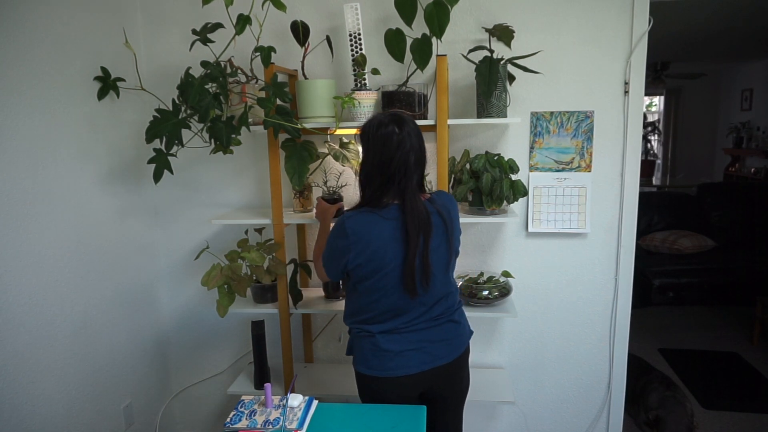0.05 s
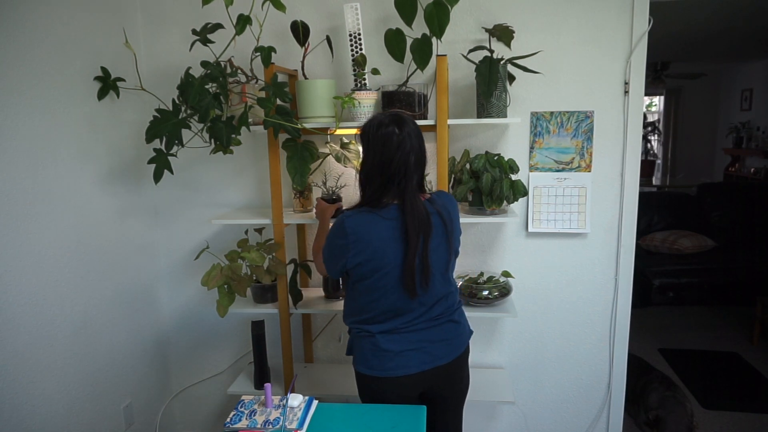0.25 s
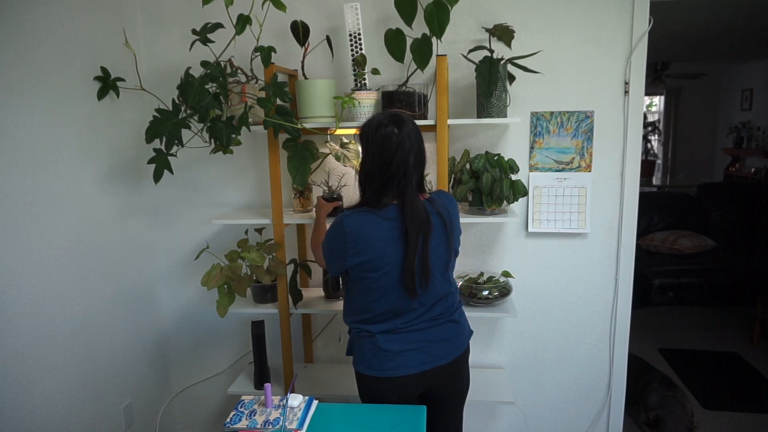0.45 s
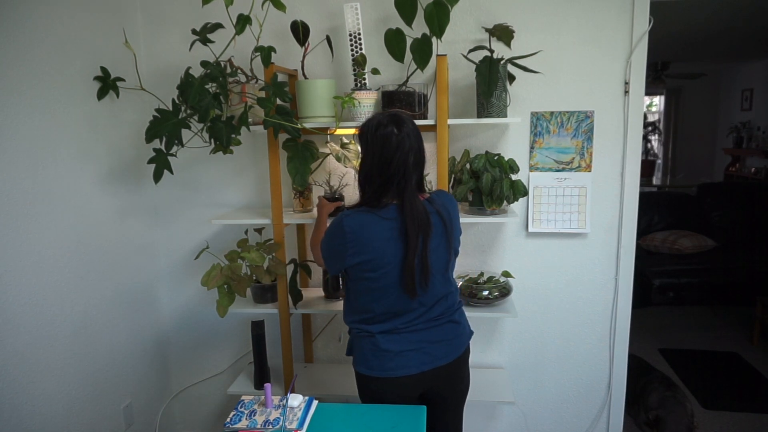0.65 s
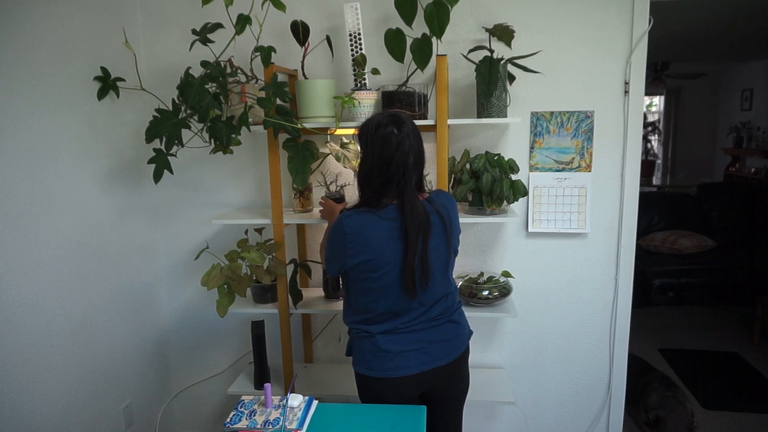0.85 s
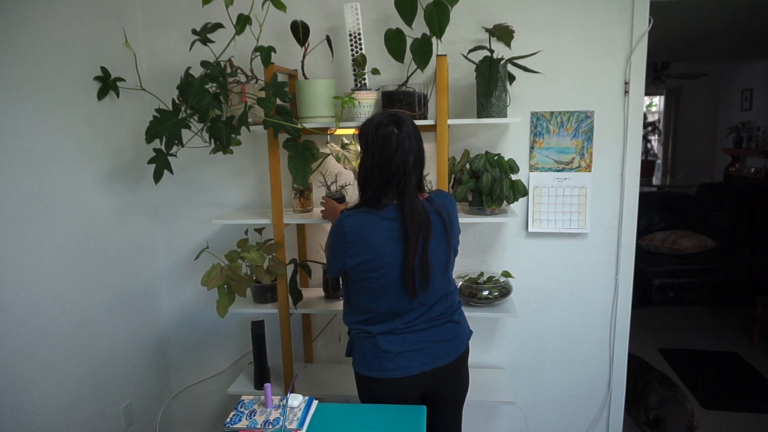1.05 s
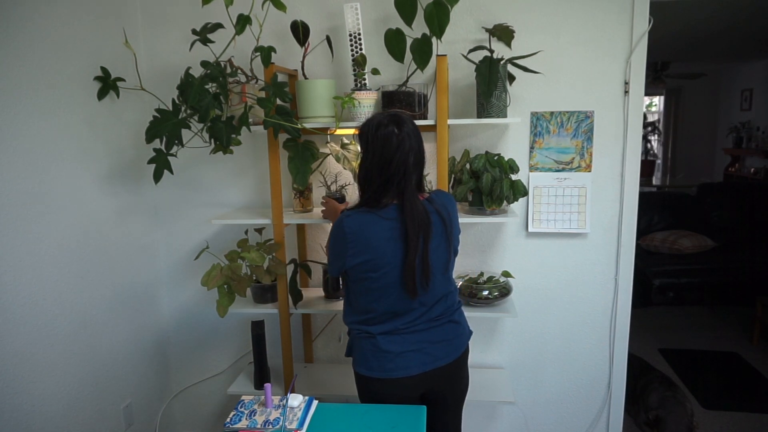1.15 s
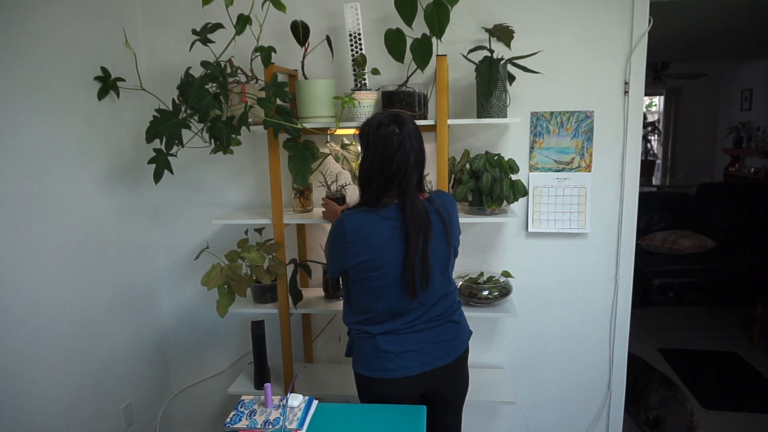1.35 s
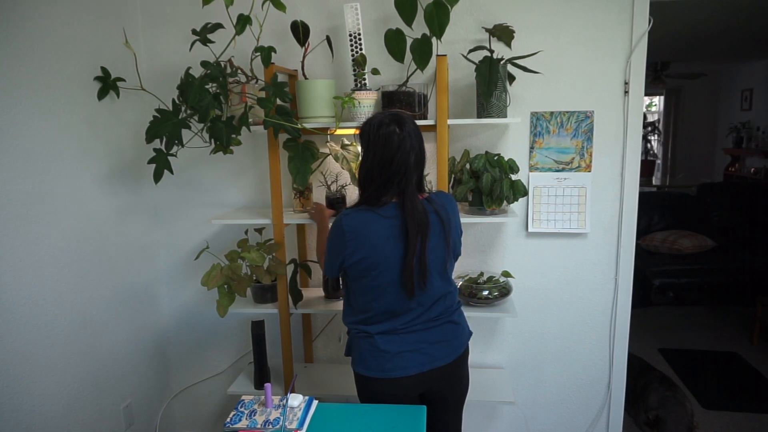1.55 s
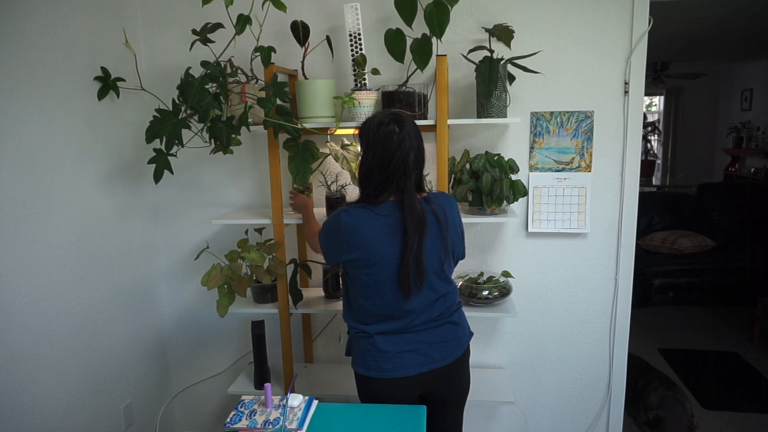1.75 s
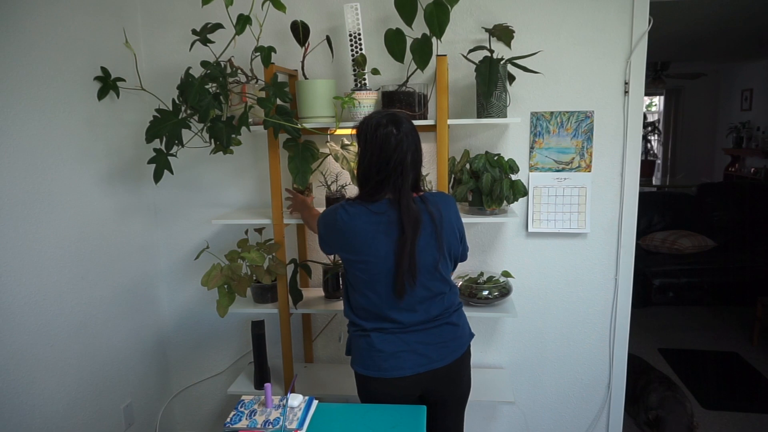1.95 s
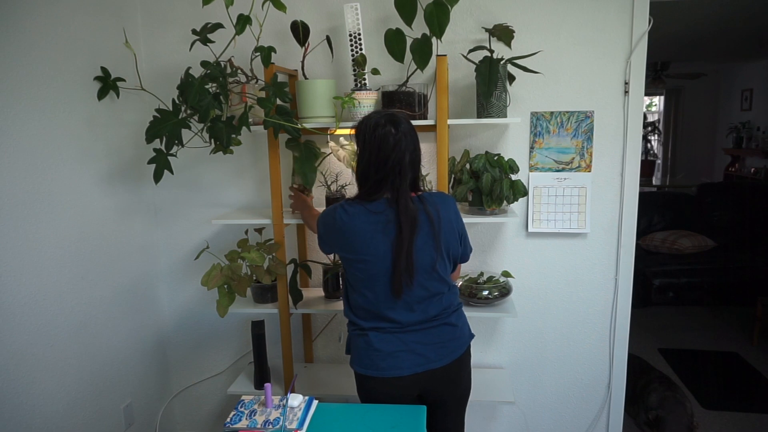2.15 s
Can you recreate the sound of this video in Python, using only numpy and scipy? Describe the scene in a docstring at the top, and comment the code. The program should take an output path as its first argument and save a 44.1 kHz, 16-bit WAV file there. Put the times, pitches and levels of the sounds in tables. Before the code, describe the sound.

A plant pot lands on a light shelf with a knock and rattle, then is pushed into place in three short, ringing scrapes. Leaves rustle faintly afterwards. The small room echoes a little, and a fan hums softly nearby.

```python
"""A plant pot is set down on a light shelf in a small room, then pushed into place in three short scrapes.
Its rim knocks and rattles as it lands, and its base sticks and slips as it slides.
Both make pot and shelf ring together, and the room echoes. Afterwards the leaves rustle faintly.
A small fan hums nearby, over a quiet hiss and a soft rush of air."""
import sys
import numpy as np
from scipy import signal
from scipy.fft import rfft, irfft
from scipy.io import wavfile

SR = 44100
rng = np.random.default_rng(int(sys.argv[2]) if len(sys.argv) > 2 else 0)


def materialize(psi):
    """Save the field psi as 16-bit PCM at rate SR to the path in sys.argv[1].

    A 1-D psi becomes a single channel; in a 2-D psi each row is a channel.
    """
    bounded = np.clip(np.atleast_2d(psi).T, -1, 1)
    quanta = np.round(bounded * 32767).astype(np.int16)
    wavfile.write(sys.argv[1], SR, quanta)


N = 97020   # 2.2 seconds
T = np.arange(N) / SR


def pot():
    """Knocking and sliding make pot and shelf ring and clatter, and the room answers."""
    struck, rubbed = knocks(POT_KNOCKS), slips()
    tones = ringing_tones(struck, rubbed)
    echo = from_db(-19) * heard(tones, room_response())
    return tones + echo + clatter(rubbed)


# The pot lands, rocks and bumps. Each row: start in seconds, level in dB, brightness in Hz.
POT_KNOCKS = [(0.2126, -8.5, 7240), (0.2170, -2, 4560), (0.2206, 1.5, 1700), (0.2256, 0, 443),
              (0.2288, 0, 455), (0.2368, -17, 490), (0.2488, -7, 1000), (0.2630, 0, 1005),
              (0.2799, -4, 400), (0.2987, -5, 613), (0.3280, -21, 800), (0.3680, -13.5, 2500),
              (0.411, -18, 3500), (0.627, -26.5, 1200), (1.222, -22, 450), (1.247, -27, 600)]

def knocks(rows):
    """Each knock is a short pulse of force; a softer contact lasts longer and sounds duller."""
    force = np.zeros(N)
    for start, db, brightness_hz in rows:
        click = np.arange(N) == int(start * SR)
        decay = np.exp(-2 * np.pi * brightness_hz / SR)
        force += from_db(db) * signal.lfilter([1 - decay], [1, -decay], click + 1e-18)
    return force


# One list for each push. Each row: time in seconds, friction level in dB, extra bass in dB.
POT_PUSHES = [
    [(0.235, -6, 3.5), (0.29, -1.5, 4), (0.34, -3.5, 4.5), (0.39, -0.5, -0.5), (0.412, 1, -19),
     (0.44, -4, -6), (0.464, 0, -4), (0.50, -8, -6), (0.555, -10.5, -1), (0.58, -41, -6)],
    [(0.612, -12.5, -4), (0.630, -6, -7), (0.655, -6.5, -14), (0.674, 1, -16), (0.71, -3.5, -2),
     (0.745, -0.5, 1), (0.78, -4.5, 3), (0.818, -13, -1), (0.832, -14, 2)],
    [(1.122, -23.5, 7), (1.150, -14.5, -2), (1.175, -12.5, 10), (1.21, -17, 11), (1.235, -22, 3),
     (1.255, -38, 7)],
]

def slips(slips_per_second=400, jitter=.35, spread_db=2.5, bass_hz=360, treble_hz=800):
    """The base sticks and slips, making a fast, uneven run of clicks that dulls as each push eases."""
    gap_chance, size_chance = rng.standard_normal((4000, 2)).T
    starts = np.cumsum(np.exp(jitter * gap_chance)) / slips_per_second
    at = (starts[starts < T[-1]] * SR).astype(int)
    clicks = np.zeros(N)
    clicks[at] = from_db(spread_db * np.clip(size_chance[:len(at)], -2, 2))
    bass = signal.sosfiltfilt(signal.butter(3, bass_hz, fs=SR, output="sos"), clicks + 1e-18)
    middle = signal.sosfilt(signal.butter(1, treble_hz, fs=SR, output="sos"), clicks - bass)
    treble = clicks - bass - middle
    force = np.zeros(N)
    for push in POT_PUSHES:
        times, db, bass_db = np.transpose(push)
        effort = from_db(np.interp(T, times, db, left=-np.inf, right=-np.inf))
        bass_gain = from_db(np.interp(T, times, bass_db))
        treble_gain = (effort / effort.max()) ** 0.59
        force += effort * (bass_gain * bass + middle + treble_gain * treble)
    return force


# The tones of pot and shelf. Each row: pitch in Hz, level when knocked in dB,
# level when rubbed in dB, seconds to fade by 60 dB.
POT_TONES = [(264, -10, -11.5, 0.75), (278, -8, -5, .6), (320.5, 0, -13.5, 0.46), (409.3, -7.5, -34, 0.84),
             (494.6, -29.5, -12, 0.49), (583, -28.5, 1, 0.47), (615, -6, 6, 0.16), (672, -2, -2, .12),
             (721.7, 2, -7, .32), (802, -30, -5.5, 0.35), (828.5, -9, -0.5, 0.19), (969, 1, 1, 0.16),
             (1006.5, -10.5, 4, 0.2), (1156, 2.5, -15, 0.086), (1233, -3, 1, 0.2), (1255, -7, 5, 0.057),
             (1382, -3, -14, 0.3), (1620, -22, -7, 0.4), (2150, -1.5, 4, 0.068), (2834, -14.5, -6.5, 0.077),
             (3130, -7.5, -5.5, 0.055), (3350, -25, -12.5, 0.17), (5420, -28, -24, 0.077)]

def ringing_tones(struck, rubbed, knock_db=-36.5, scrape_db=-56.5):
    """Pot and shelf vibrate together at their own natural pitches."""
    tones = np.zeros(N)
    for k, (hz, hit_db, rub_db, fade_s) in enumerate(POT_TONES):
        force = from_db(knock_db + hit_db) * struck + from_db(scrape_db + rub_db) * rubbed
        tones += (-1) ** k * ring(force, hz, fade_s)   # neighbours swing opposite ways
    return signal.sosfilt(signal.butter(4, 230, "high", fs=SR, output="sos"), tones)


# The many short rings between those tones, for knocks and for scrapes.
# Each row: frequency in Hz, relative level in dB.
KNOCK_SPECTRUM = [(50, -40.5), (110, -25), (200, -30), (280, -3), (450, -7), (650, 0.5), (1250, -5),
                  (1750, -7.5), (2500, -6.5), (3400, -16), (4200, -23.5), (6500, -35.5), (11000, -49)]
SCRAPE_SPECTRUM = [(50, -56), (110, -33), (220, -13.5), (285, 0.5), (430, -9), (620, 8.5), (900, -3),
                   (1300, 3), (1850, -6), (2300, -7.5), (2950, -15), (3300, -17), (3750, -22.5),
                   (5500, -31), (9000, -48.5)]

def clatter(rubbed, spots=4, knock_db=-0.5, scrape_db=-17.5):
    """Knocks and slips fall on several spots of the base, and each spot sounds a little different."""
    slip_spot = rng.integers(0, spots, N)
    hits = colour(np.array([knocks(POT_KNOCKS[k::spots]) for k in range(spots)]), KNOCK_SPECTRUM)
    rubs = colour(np.array([rubbed * (slip_spot == k) for k in range(spots)]), SCRAPE_SPECTRUM)
    contacts = from_db(knock_db) * hits + from_db(scrape_db) * rubs
    return sum(heard(contact, spot_response()) for contact in contacts)


def spot_response(direct_db=-9, ring_db=-4.5, room_db=-4.5, fade_s=0.044):
    """A tap on one spot reaches the ears as a direct click, a short noisy ring and the room's echo."""
    noise = rng.standard_normal(N) + from_db(-10.5) * diffuse()   # a little stereo width
    body = from_db(ring_db) * rms_one(noise * fade(fade_s)) / np.sqrt(N)
    body[:, 0] += from_db(direct_db)
    return body + from_db(room_db) * room_response()


# The leaves' swishes. Each row: time of the peak in seconds, length in seconds, level in dB,
# centre frequency in Hz, width of the band in Hz.
LEAF_SWISHES = [(1.308, .04, -74, 3400, 233), (1.395, 0.04, -74.5, 3310, 353),
                (1.5, 0.083, -72.5, 3250, 278), (1.565, .04, -81, 3270, 247),
                (2.112, 0.092, -74, 2530, 1900)]

def leaves():
    """Leaves brush each other in narrow bands of noise that swell and fade."""
    sound = 0
    for peak, length, db, hz, width in LEAF_SWISHES:
        band = signal.butter(2, [hz - width / 2, hz + width / 2], "band", fs=SR, output="sos")
        swell = np.exp(-(2 * (T - peak) / length) ** 2)
        sound += from_db(db) * swell * rms_one(signal.sosfilt(band, diffuse()))
    return sound


# The tone of the fan's blades. Each row: time in seconds, pitch in Hz, level in dB.
BLADE_TONE = [(0, 290.7, -65.5), (0.08, 293.4, -66.5), (0.14, 295.7, -77), (0.602, 291, -63.5),
              (1.05, 292, -64.5), (1.348, 289, -63), (1.7, 288.7, -64), (1.85, 288.3, -63.5),
              (2.2, 287.5, -61)]
# Its overtones. Each row: multiple of the pitch, level next to the main tone in dB.
BLADE_OVERTONES = [(2, -17), (3, -19.5), (4, -27)]

def fan(waver_hz=1.0, waver_db=0.1, hum_hz=100, hum_db=-95.5):
    """Turning blades make a wavering tone with weak overtones, over a low hum."""
    times, hz, db = np.transpose(BLADE_TONE)
    pitch = np.interp(T, times, hz) + waver_hz * drift(3.9)
    phase = 2 * np.pi * np.cumsum(pitch) / SR
    tone = np.sin(phase)
    for multiple, overtone_db in BLADE_OVERTONES:
        tone += from_db(overtone_db + 1.4 * drift(12)) * np.sin(multiple * phase)
    gain = from_db(np.interp(T, times, db) - waver_db * drift(6.4))
    hum = from_db(hum_db) * np.sin(2 * np.pi * hum_hz * T)
    return np.sqrt(2) * (gain * tone + hum)


# The steady air and the soft rush. Each row: frequency in Hz, relative level in dB.
AIR_SPECTRUM = [(30, -25), (60, -25), (90, -11.5), (190, -4.5), (265, 6), (420, 4), (620, 5), (1100, -6),
                (2000, -11.5), (4000, -12), (7000, -14.5), (11000, -25)]
RUSH_SPECTRUM = [(100, -46), (200, -15.5), (270, 6.5), (420, -10), (800, -5), (1120, 2.5), (1500, -7),
                 (2200, -11.5), (3200, -18.5), (5000, -33.5), (10000, -21)]
# How the rush swells. Each row: time in seconds, level in dB.
RUSH_SWELL = [(0, -72.5), (0.2, -69), (1.0, -64.5), (1.3, -64), (1.55, -63.5), (1.8, -66), (2.0, -66),
              (2.12, -64), (2.2, -62.5)]

def air(steady_db=-71):
    """Steady room noise lies under a soft rush that slowly swells."""
    steady = from_db(steady_db) * colour(diffuse(), AIR_SPECTRUM)
    rush_gain = from_db(np.interp(T, *np.transpose(RUSH_SWELL)))
    return steady + rush_gain * colour(diffuse(), RUSH_SPECTRUM)


# The room's echo. Each row: frequency in Hz, seconds to fade by 60 dB,
# how alike the two ears are from 0 to 1.
ROOM_ECHO = [(97, 0.13, 0.81), (296, 0.91, 0.87), (655, 0.57, 0.48), (1300, 0.45, 0.2), (2780, 0.5, 0.18),
             (5530, 0.84, 0.21), (9900, 0.37, 0.29)]

def room_response(build_s=0.0028):
    """Echoes from the walls build up quickly, then each band fades at its own speed."""
    tail = sum(band * fade(at_hz(ROOM_ECHO, hz)) for hz, band in diffuse_bands())
    return rms_one(tail * (1 - np.exp(-T / build_s))) / np.sqrt(N)


def diffuse_bands():
    """Stereo noise in bands, most alike in both ears in the bass; gives (centre in Hz, noise) pairs."""
    edges_hz = [0, 140, 280, 560, 1120, 2240, 4480, 8960, SR / 2]
    mid, side = rfft(rng.standard_normal((2, N)))
    hz = np.arange(len(mid)) * SR / N
    alike = at_hz(ROOM_ECHO, hz, column=2)
    ears = np.sqrt((1 + alike) / 2) * mid + np.sqrt((1 - alike) / 2) * side * [[1], [-1]]
    return [((low + high) / 2, irfft(ears * (hz >= low) * (hz < high), N))
            for low, high in zip(edges_hz, edges_hz[1:])]


def diffuse():
    """White stereo noise arriving from all round."""
    return sum(band for _, band in diffuse_bands())


def heard(x, response):
    """Give every sample of a sound the same stereo echo."""
    return signal.fftconvolve(x[None], response[:, :N // 3], axes=1)[:, :N]


def ring(force, hz, fade_s):
    """Each click of force starts a sine wave that dies away."""
    decay = np.exp(-np.log(1000) / (fade_s * SR))
    step = 2 * np.pi * hz / SR
    return signal.lfilter([0, np.sin(step)], [1, -2 * decay * np.cos(step), decay ** 2], force + 1e-18)


def colour(x, spectrum, size=2 ** 18):
    """Shape a sound's bass and treble by a table; white noise keeps its power."""
    gains = rms_one(from_db(at_hz(spectrum, np.arange(size // 2 + 1) * SR / size)))
    cepstrum = irfft(np.log(gains))
    # Folding onto the first half makes the filter ring only after a click, never before.
    cepstrum[1:size // 2] *= 2
    cepstrum[size // 2 + 1:] = 0
    return irfft(rfft(x, size) * np.exp(rfft(cepstrum)))[..., :N]


def drift(rate_hz):
    """A slow random wander with a typical size of 1."""
    r = np.exp(-2 * np.pi * rate_hz / SR)
    return rms_one(signal.lfilter([1], [1, -2 * r, r * r], rng.standard_normal(2 * N))[N:])


def fade(seconds):
    """A curve that falls by 60 dB in the given time."""
    return np.exp(-np.log(1000) * T / seconds)


def at_hz(rows, hz, column=1):
    """Read between a table's rows, with octaves evenly spaced."""
    table = np.array(rows)
    return np.interp(np.log(np.maximum(hz, 1)), np.log(table[:, 0]), table[:, column])


def from_db(db):
    """Turn decibels into a number to multiply by."""
    return 10 ** (np.asarray(db) / 20)


def rms_one(x):
    """Scale a signal to an average power of 1."""
    return x / np.sqrt(np.mean(x ** 2) + 1e-20)


def scene(right_lag_samples=1.28):
    """Pot and fan sit a little to the left, with air and leaves all round."""
    left, right = (pot() + fan()) * from_db([[.3], [-.3]])
    late_right = np.interp(T - right_lag_samples / SR, T, right)
    return np.array([left, late_right]) + air() + leaves()


def record(dry, cutoff_hz=11080):
    """The highest treble is cut off steeply."""
    return signal.sosfilt(signal.ellip(12, .1, 70, cutoff_hz, fs=SR, output="sos"), dry)


dry = scene()
out = record(dry)
materialize(out)
```